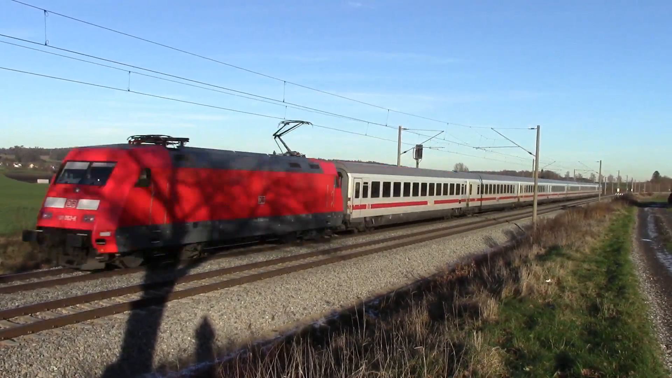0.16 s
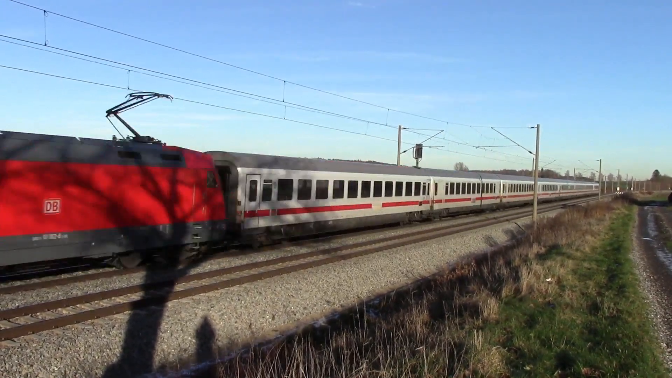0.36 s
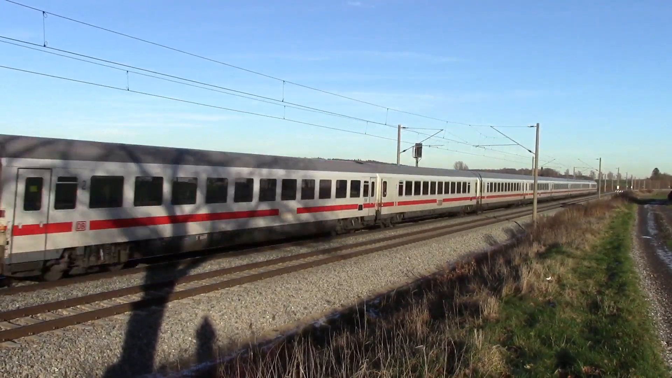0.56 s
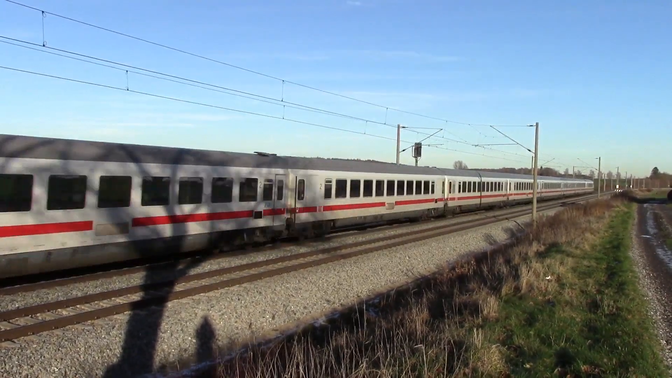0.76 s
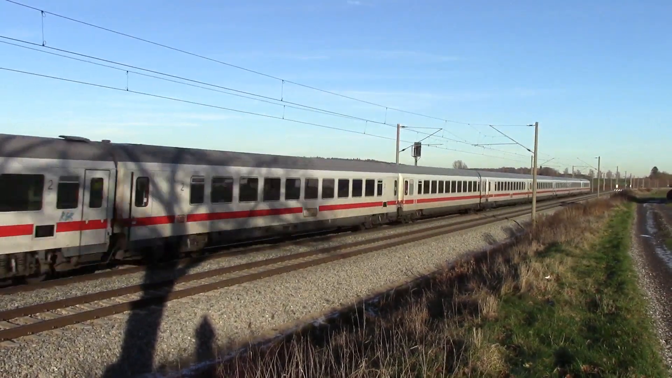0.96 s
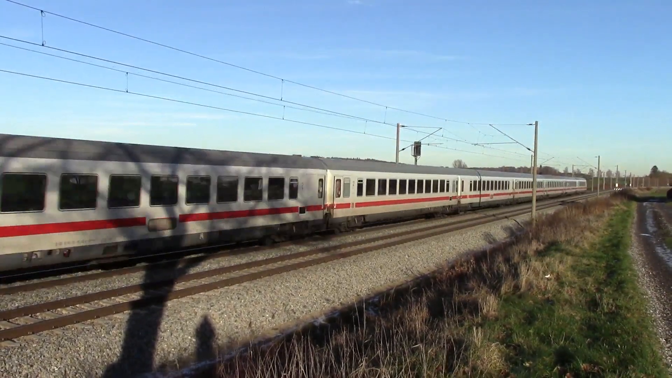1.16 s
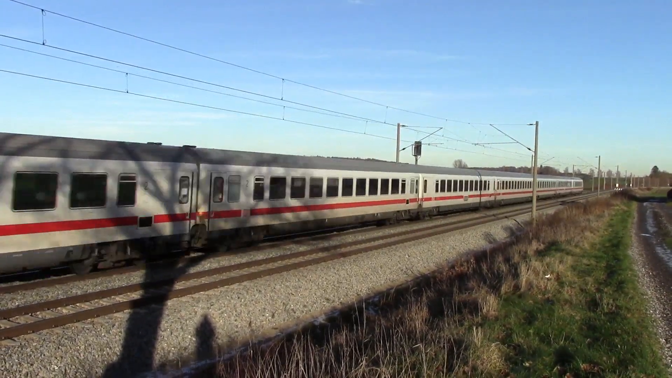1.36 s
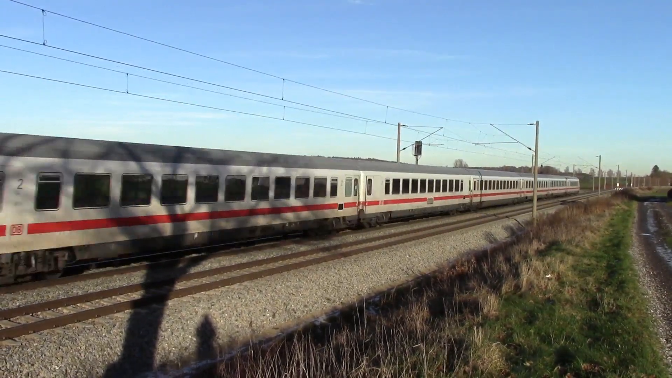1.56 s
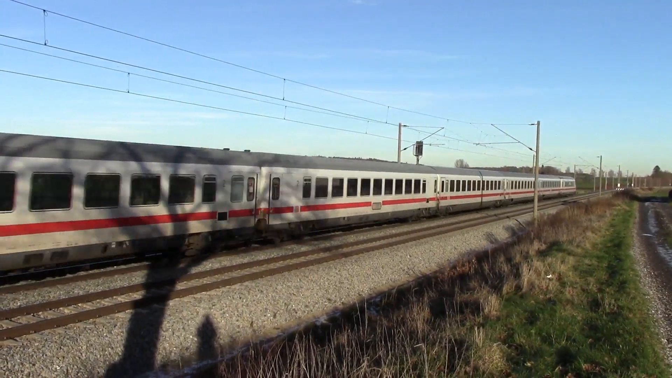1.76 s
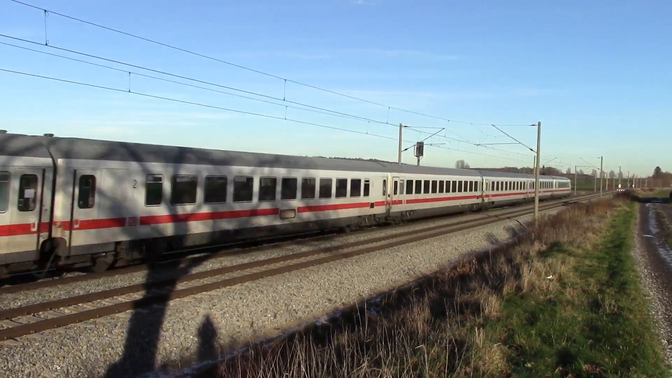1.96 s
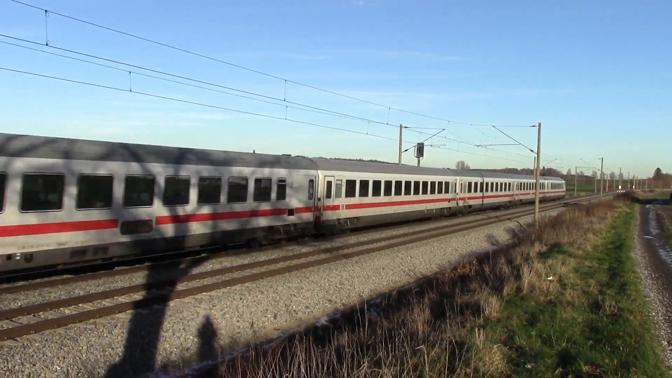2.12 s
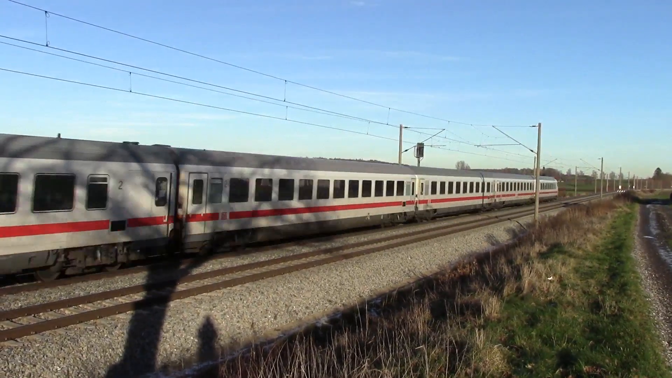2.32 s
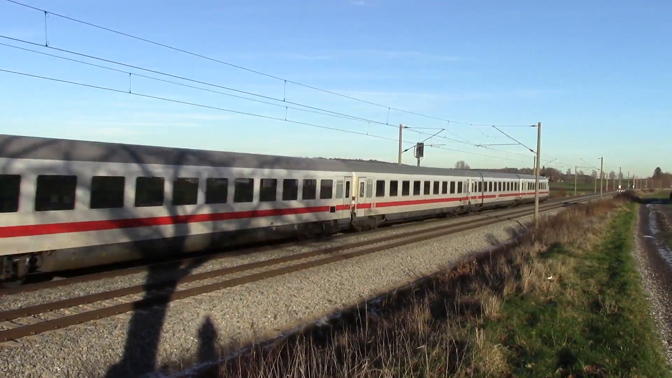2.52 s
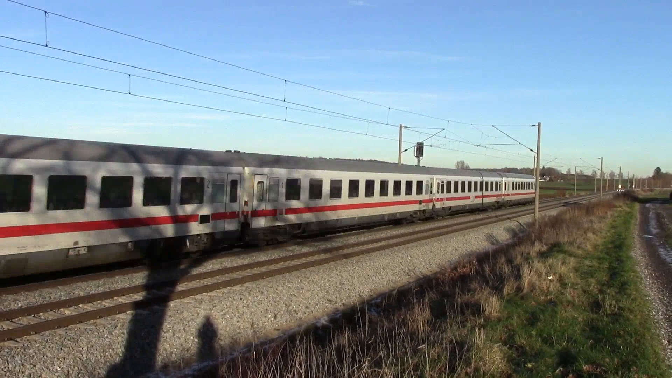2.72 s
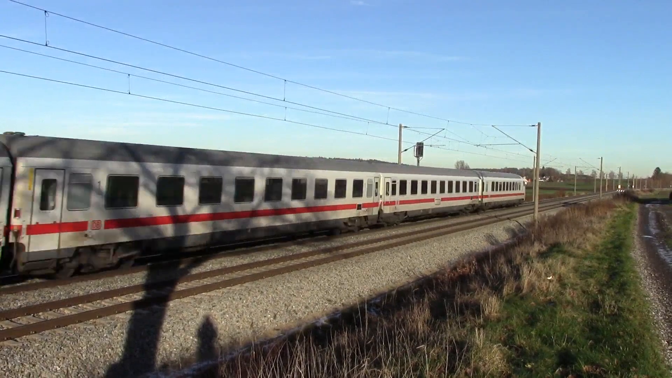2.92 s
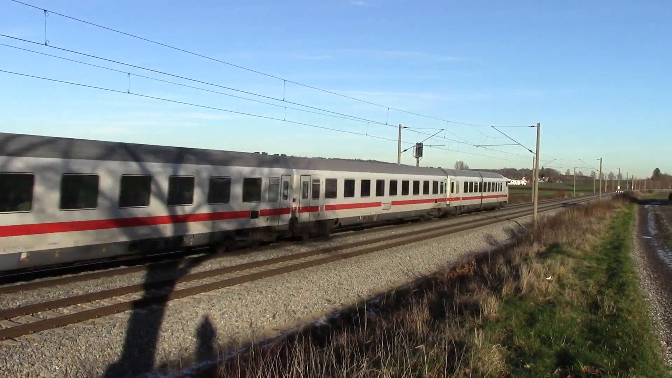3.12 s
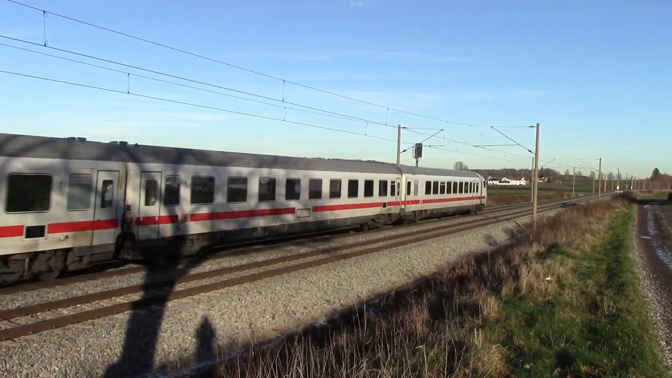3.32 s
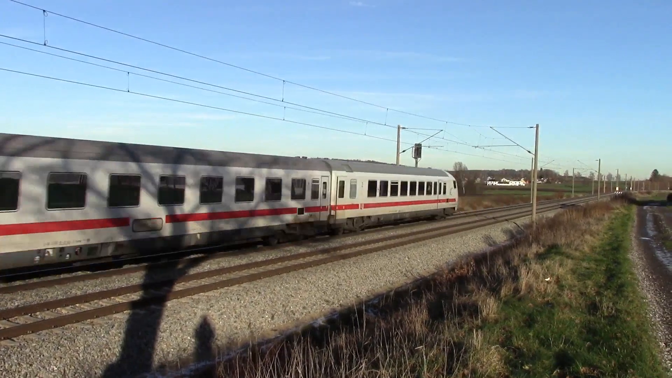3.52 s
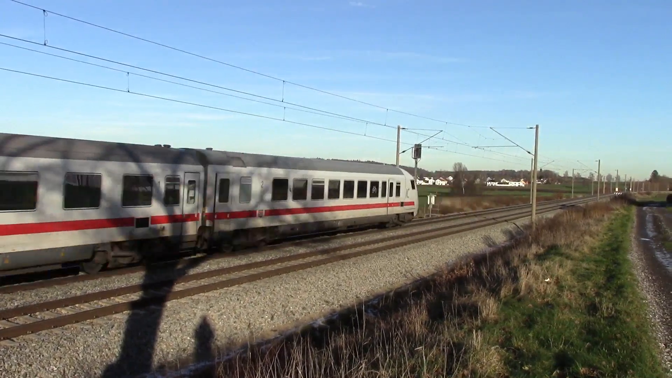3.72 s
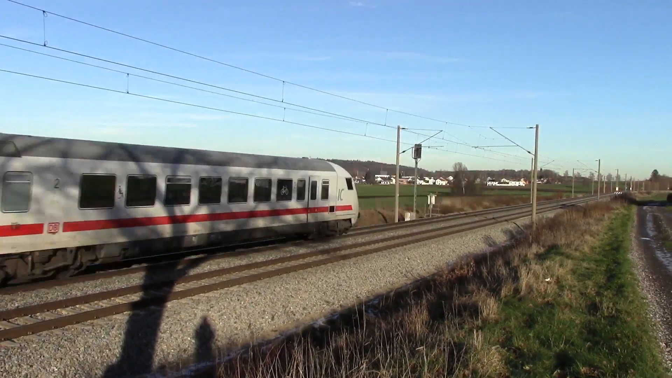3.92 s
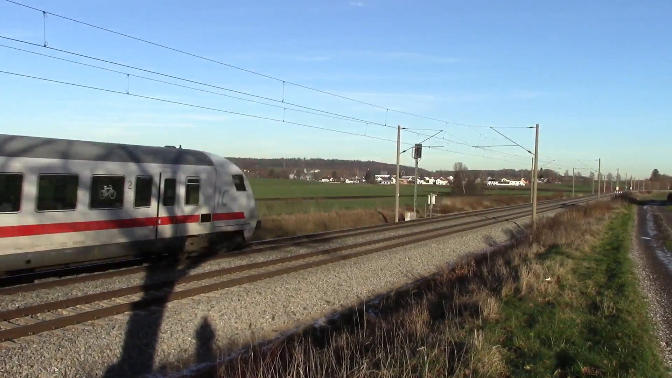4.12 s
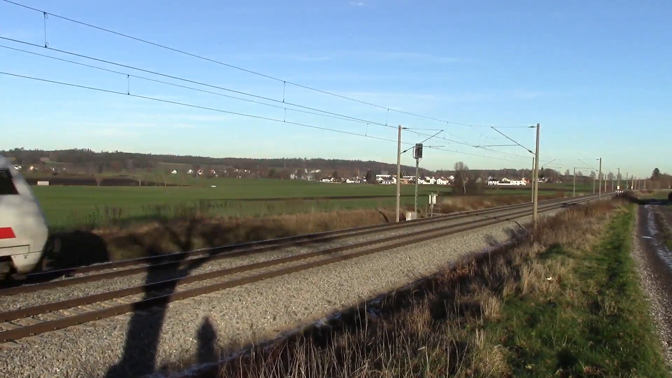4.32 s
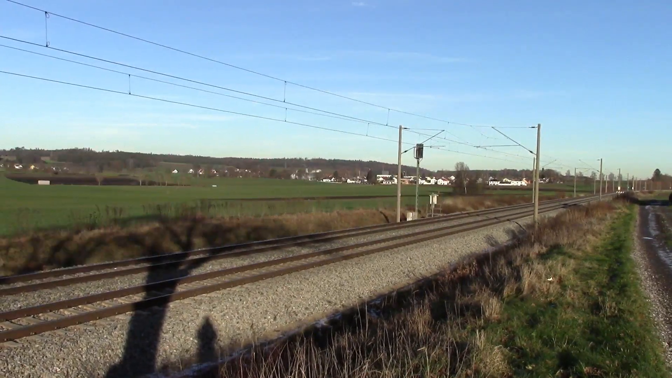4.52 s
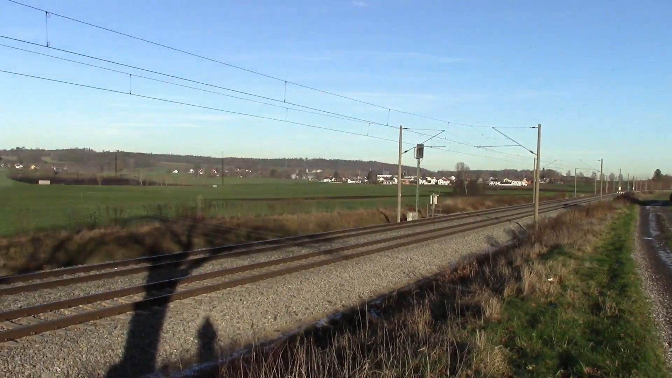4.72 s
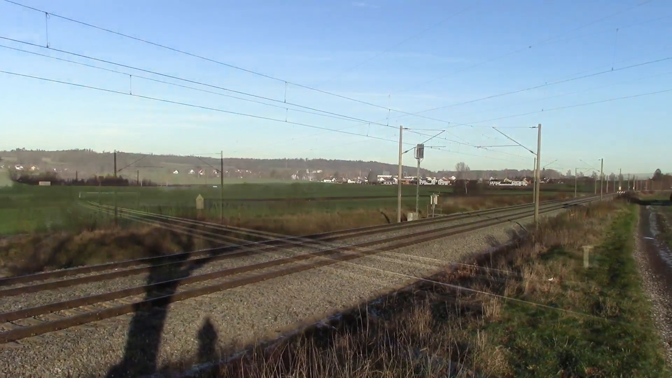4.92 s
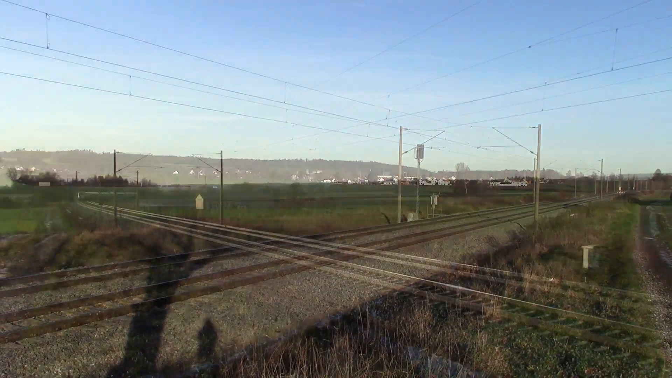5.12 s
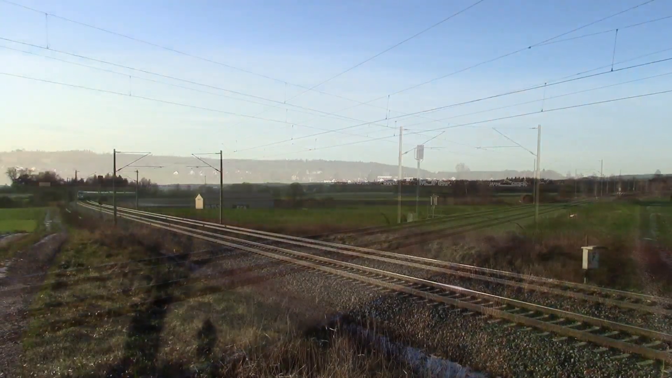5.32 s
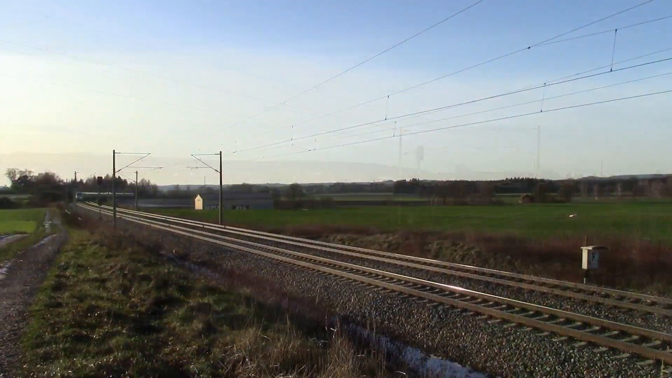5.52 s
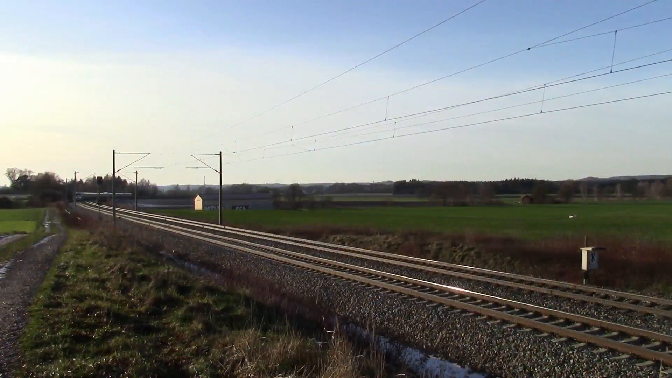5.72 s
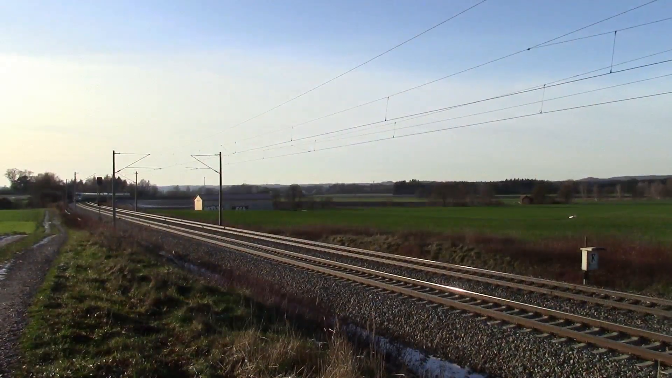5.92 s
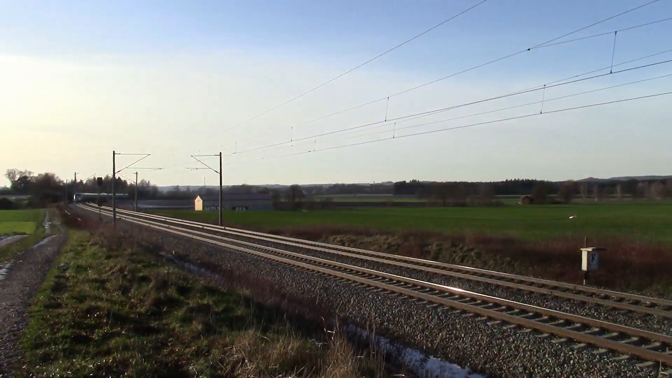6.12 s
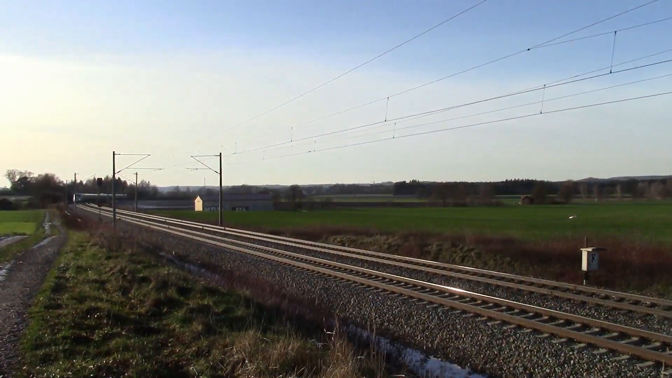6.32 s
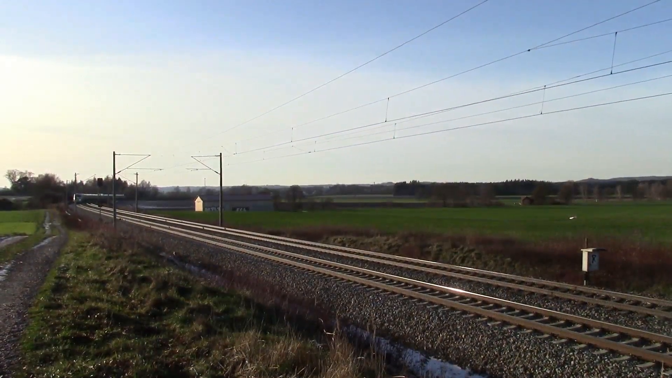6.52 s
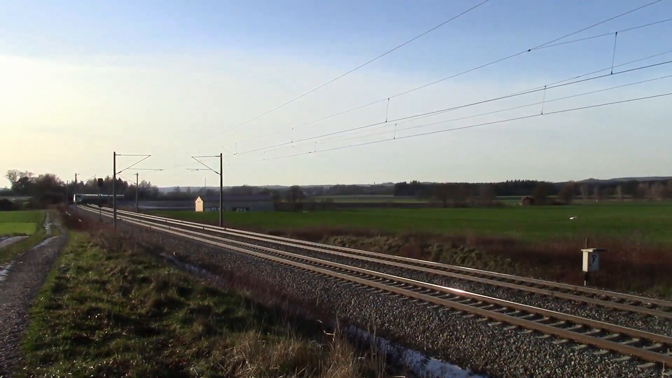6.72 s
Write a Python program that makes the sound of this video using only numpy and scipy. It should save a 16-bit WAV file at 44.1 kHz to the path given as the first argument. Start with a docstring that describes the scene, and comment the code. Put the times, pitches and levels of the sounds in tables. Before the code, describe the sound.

Open fields, close stereo microphone a few metres from the track. From 0 s the sound is already loud: an electric locomotive roars past, abreast at about 0.6 s, its unsteady gear, motor and fan tones sliding down in pitch beneath an airy high hiss. By 1 s it gives way to coaches: a dense, broad steel-on-steel rush with low body rumble swelling as each passes, duller at first and gradually brighter. From about 1.7 to 4.5 s bogies surge by roughly every half second, with short wavering metallic squeals and chirps around 2 kHz, strongest from 2.5 s. After 4.5 s the last wheels pass and the roar falls quickly; thin rail ringing trails around 5 s. Between 5 and 5.6 s it dissolves into very quiet, dull country air. From about 5.7 s a faint low engine hum near 90 Hz wavers and slowly grows to the end, with soft breeze puffs.

```python
"""Electric train racing past in open fields

An electric locomotive and its coaches race past a few metres from the microphone.
Gear, motor and fan tones with Doppler fall, and coloured noise for the pantograph's hiss, make the locomotive.
Filtered noise makes rail roar, air and bogie surges; short gliding sines are gear strands,
then singing wheels, last the ringing rails.
The rush dissolves into quiet country air, then the low harmonics of a distant engine emerge.
"""
import sys
import numpy as np
from scipy import signal
from scipy.fft import rfft, irfft
from scipy.io import wavfile
from scipy.ndimage import uniform_filter1d, minimum_filter1d, map_coordinates

SR = 44100
rng = np.random.default_rng(int(sys.argv[2]) if len(sys.argv) > 2 else 0)


def output_pcm(signal):
    """Save a mono or channel-first signal as 16-bit PCM at the path in sys.argv[1].

    Samples are clipped to [-1, 1] before scaling.
    """
    pcm = np.clip(np.atleast_2d(signal).T, -1, 1) * 32767
    wavfile.write(sys.argv[1], SR, np.round(pcm).astype(np.int16))


N = 298248
TIME = np.arange(N) / SR
BINS_HZ = np.arange(N // 2 + 1) * SR / N


def undb(db):
    """Decibels to gain."""
    return 10 ** (np.asarray(db) / 20)


def unit(x):
    """Scale to rms 1."""
    return x / np.sqrt(np.mean(np.abs(x) ** 2))


def across(points, hz):
    """Read (Hz, value) points on a log-frequency axis."""
    f, value = np.transpose(points)
    return np.interp(np.log(hz + 1), np.log(f), value)


def envelope(db, until_s, fall_db_per_s, from_s=0, rise_db_per_s=0):
    """Gain that rises, holds and falls away, straight in dB."""
    before = np.maximum(from_s - TIME, 0)
    after = np.maximum(TIME - until_s, 0)
    return undb(db - rise_db_per_s * before - fall_db_per_s * after)


def bump(middle_s, spread_s):
    """Gaussian bump of height 1 with the given standard deviation."""
    return np.exp(-((TIME - middle_s) / spread_s) ** 2 / 2)


def tone(hz):
    """Sine following an instantaneous frequency, peak 1."""
    return np.sin(2 * np.pi * np.cumsum(hz) / SR)


def walk(rate_hz):
    """Smooth chance with spread 1, changing about rate_hz times a second."""
    steps = TIME[::16]
    chance = rng.standard_normal(4096)
    smooth = map_coordinates(chance, [steps * rate_hz], order=3, mode="wrap")
    return unit(np.interp(TIME, steps, smooth))


def turbulence(colour, patchy_db, rate_hz, streak_db=0, tilt_db=0):
    """Coloured noise whose third-octave regions flare and sink; narrow streaks slide down in pitch."""
    hz, s, cells = signal.stft(rng.standard_normal(N), SR, nperseg=2048)
    octave, when = np.meshgrid(np.log2(1 + hz / 100), s, indexing="ij")
    chance = rng.standard_normal((512, 512))
    patches = map_coordinates(chance, [3 * octave, when * rate_hz], order=1, mode="wrap")
    sliding = 36 * (octave + .3 * when)
    streaks = map_coordinates(chance.T, [sliding, 11 * when], order=1, mode="wrap")
    # beyond its end points the colour falls 12 dB an octave
    beyond = np.abs(np.log2((hz + 1) / np.clip(hz + 1, colour[0][0], colour[-1][0])))
    db = (across(colour, hz) - 12 * beyond)[:, None]
    # the spectrum tilts about its own centre
    centre = np.average(octave[:, 0], weights=undb(2 * db[:, 0]))
    tilt = np.interp(s, TIME, tilt_db * np.ones(N)) * np.clip(octave - centre, -2, 2)
    cells = cells * undb(db + tilt + patchy_db * patches + streak_db * streaks)
    return unit(signal.istft(cells, SR)[1][:N])


def ring(hz, width_hz):
    """A resonance shaken by noise; its centre may glide."""
    shake = walk(width_hz) + 1j * walk(width_hz)
    carrier = np.exp(2j * np.pi * np.cumsum(hz * np.ones(N)) / SR)
    return unit(np.real(shake * carrier))


SPEED_M_S, SOUND_M_S, TRACK_M = 55, 343, 8.5
ABREAST_S = 0.63  # the locomotive is closest


def bearing(abreast_s=ABREAST_S):
    """Where a part of the locomotive is: -1 far ahead, 0 abreast, 1 far gone."""
    along_m = SPEED_M_S * (TIME - abreast_s)
    return along_m / np.hypot(along_m, TRACK_M)


def doppler(abreast_s):
    """Pitch ratio of a source passing at train speed."""
    return 1 / (1 + SPEED_M_S / SOUND_M_S * bearing(abreast_s))


# gear, motor and fan tones: pitch_on_board_hz, abreast_s, level_db, full_from_s, held_until_s
DRIVE_TONES = [(1212, .62, -27, .25, 0.61), (1155, .76, -29, 0.26, .44), (1240, .7, -27.5, 0.33, .44),
               (947, .64, -31, .5, 0.75), (571, 0.67, -32, .098, 0.27), (1522, 0.83, -32, 0.35, 0.46),
               (1790, .68, -37, .05, .16), (1220, .62, -25, 0.71, 0.775), (629, .66, -32.5, .039, .4)]
TONE_RISE_DB_PER_S, TONE_FALL_DB_PER_S = 35, 130
TONE_WAVER_SHARE, TONE_THROB_DB = 0.02, 3.2  # spread


def drive_tones():
    """Gear, motor and fan tones of many pitches, each unsteady and throbbing, fall as the locomotive passes."""
    out = 0
    for pitch_hz, abreast_s, level_db, from_s, until_s in DRIVE_TONES:
        hz = pitch_hz * doppler(abreast_s) * (1 + TONE_WAVER_SHARE * walk(85))
        throb = undb(TONE_THROB_DB * walk(37.9).clip(-1.5, 1.5))
        gain = throb * envelope(level_db, until_s, TONE_FALL_DB_PER_S, from_s, TONE_RISE_DB_PER_S)
        out = out + gain * np.sqrt(2) * tone(hz)
    return out


# locomotive's running roar, spectrum: freq_hz, density_db_per_hz (relative)
ROAR_COLOUR = [(120, -51), (200, -9.5), (270, 0.5), (350, -3), (480, 0.5), (750, -2.5), (1000, -0.5),
               (1300, 0), (1600, -2), (2400, -52), (4000, -38)]
# pantograph's hiss, spectrum: freq_hz, density_db_per_hz (relative)
PANTOGRAPH_COLOUR = [(3000, -12), (4500, -6), (6500, -16), (8000, 3), (9500, 4), (10400, 1), (11500, -10),
                     (13000, -24), (15500, -30)]
FAN_HZ = 592  # cooling fan, as heard on board


def locomotive():
    """Drive tones and fan roar drop in pitch; heavy wheels roar, the pantograph hisses on the wire."""
    fan = ring(FAN_HZ * doppler(ABREAST_S), width_hz=220)
    fan = fan * envelope(-20, until_s=-0.21, fall_db_per_s=33)
    roar = turbulence(ROAR_COLOUR, patchy_db=2.0, rate_hz=20.8, streak_db=3.5)
    roar = roar * envelope(-22.5, until_s=0.69, fall_db_per_s=21)
    hiss = turbulence(PANTOGRAPH_COLOUR, patchy_db=3.5, rate_hz=19.2, streak_db=-4.0)
    hiss = hiss * envelope(-35.5, until_s=0.57, fall_db_per_s=51)
    return drive_tones() + fan + roar + hiss


# spectra of body rumble, rail roar, wheel noise, air hiss: freq_hz, density_db_per_hz (relative)
BODY_COLOUR = [(25, -27), (55, -38), (85, -12.5), (125, -14.5), (170, -8.5), (245, 0.5), (310, -0.5),
               (430, -3), (800, -19.5)]
RAIL_COLOUR = [(200, -22), (330, -18.5), (460, -5.5), (660, -4.5), (820, -1), (960, 0.5), (1060, -1),
               (1200, -5.5), (1500, -24), (2500, -61)]
WHEEL_COLOUR = [(800, -68), (1200, -5), (1450, 1), (1760, 1.5), (2100, 0), (2400, -1), (2750, -3),
                (3400, -7), (4000, -12), (4600, -25), (6500, -49)]
AIR_COLOUR = [(2000, -10), (3500, 6.5), (4700, 1.5), (6000, 0), (7200, -1.5), (8500, -7.5), (10200, -11),
              (12500, -20), (16000, -31)]
# air hiss over time: time_s, level_db (before a 3.5 dB lift)
HISS = [(0.04, -30), (0.56, -30.5), (1.21, -37.5), (1.96, -36), (3.03, -40.5), (3.08, -38.5), (4.27, -32.5),
        (4.39, -31.5), (4.65, -36), (4.78, -35), (4.98, -46), (5.32, -49), (5.5, -57)]
# rumble swells as car bodies go by: middle_s, level_db
RUMBLES = [(.23, -33.5), (.62, -34), (1.02, -33.5), (1.45, -33.5), (1.88, -37), (2.86, -39), (3.21, -35),
           (3.52, -36.5), (3.82, -37), (4.66, -40), (4.84, -36.5), (5.23, -40.5)]
RUMBLE_SPREAD_S = 0.13 / np.sqrt(2)
# wheel noise sinks behind the locomotive, between bogies and behind the last coach:
# middle_s, half_length_s (to 1/e of the depth), depth_db
LULLS = [(0.953, 0.47, -1), (1.984, 0.041, -1.5), (2.37, 0.16, -0.6), (3.45, .04, -2), (4.66, 0.089, -1.5)]
BODY_EASE_DB_PER_S, RAIL_EASE_DB_PER_S = 1.32, 0.5  # as the heavy locomotive draws away
# wheels and air: bright head-on, dull just behind the locomotive, brighter to the tail
HEAD_ON_TILT_DB_PER_OCT, TILT_RISE_DB_PER_OCT_PER_S, NEUTRAL_S, TAIL_S = 4, 0.86, 2.16, 4.5


def rolling():
    """Rough steel on steel shakes bodies, rails and wheels; air tears along the train."""
    tilt_db = TILT_RISE_DB_PER_OCT_PER_S * (np.minimum(TIME, TAIL_S) - NEUTRAL_S)
    tilt_db = tilt_db + HEAD_ON_TILT_DB_PER_OCT * np.maximum(-bearing(), 0)

    steady = envelope(-36.5, until_s=5.8, fall_db_per_s=6.4) * undb(-BODY_EASE_DB_PER_S * TIME)
    swell_power = sum(undb(level_db) ** 2 * bump(s, RUMBLE_SPREAD_S) for s, level_db in RUMBLES)
    body_gain = np.sqrt(steady ** 2 + swell_power)
    body = body_gain * turbulence(BODY_COLOUR, patchy_db=1.0, rate_hz=12)

    rail_gain = envelope(-26.5, until_s=4.42, fall_db_per_s=12.7) * undb(-RAIL_EASE_DB_PER_S * TIME)
    rail = rail_gain * turbulence(RAIL_COLOUR, patchy_db=1.76, rate_hz=14, streak_db=-0.5)

    lull_db = sum(depth_db * bump(s, half_s / np.sqrt(2)) for s, half_s, depth_db in LULLS)
    wheel_gain = undb(lull_db) * envelope(-21, until_s=4.72, fall_db_per_s=27)
    wheels = wheel_gain * turbulence(WHEEL_COLOUR, patchy_db=0.8, rate_hz=16, streak_db=1.1, tilt_db=tilt_db)

    hiss_s, hiss_db = np.transpose(HISS)
    air_gain = undb(np.interp(TIME, hiss_s, hiss_db) + 3.5)
    air = air_gain * turbulence(AIR_COLOUR, patchy_db=1.5, rate_hz=14, tilt_db=tilt_db)

    # changing load on the contact patches makes the bright sound flutter as one
    flutter = undb(0.53 * walk(30) + 0.45 * walk(110))
    return body + rail + (wheels + air) * flutter


# hollow surges in the roar: middle_s, spread_s, pitch_hz, width_hz, level_db
BOOMS = [(0.026, 0.036, 760, 168, -26), (0.122, 0.043, 665, 141.4, -23.5), (1.074, .055, 1330, 331, -27),
         (.394, 0.026, 755, 234, -24), (0.957, .025, 1000, 250, -25), (3.054, 0.047, 685, 209.6, -35),
         (3.218, 0.039, 680, 210.4, -34), (4.753, 0.083, 3520, 501, -31), (4.9, 0.027, 640, 199, -34),
         (4.973, 0.015, 619, 188.6, -32.5), (4.962, .025, 950, 299, -34.5), (5.087, 0.022, 2000, 350, -36),
         (5.227, .042, 310, 99.8, -41)]


def booms():
    """Short hollow surges, noise-shaken resonances, stand out of the roar."""
    out = 0
    for middle_s, spread_s, pitch_hz, width_hz, level_db in BOOMS:
        out = out + undb(level_db) * bump(middle_s, spread_s) * ring(pitch_hz, width_hz)
    return out


SQUEALS_PER_S, SQUEAL_MIN_DB, SQUEAL_MEAN_S, SQUEAL_MEAN_SLIDE_OCT_PER_S = 17, -30, .075, .3
SQUEAL_LOW_HZ, SQUEAL_HIGH_HZ = 1503, 2250
COACHES_FROM_S, COACHES_UNTIL_S = 2.2, 4.5


def faint_squeals():
    """Rows like those of GLIDING_TONES, drawn by chance for the many quieter wheels of the coaches."""
    span_s = COACHES_UNTIL_S - COACHES_FROM_S
    rows = []
    for when, long, pitch, loud, slide in rng.random((200, 5))[:int(SQUEALS_PER_S * span_s)]:
        middle_s = COACHES_FROM_S + when * span_s
        length_s = SQUEAL_MEAN_S * (.5 + long)
        pitch_hz = SQUEAL_LOW_HZ * (SQUEAL_HIGH_HZ / SQUEAL_LOW_HZ) ** pitch
        level_db = SQUEAL_MIN_DB + 2 * loud
        rows.append((middle_s, length_s, pitch_hz, level_db, 2 * SQUEAL_MEAN_SLIDE_OCT_PER_S * slide))
    return rows


# short gliding tones: locomotive gear strands first, then singing wheels, last the ringing rails:
# middle_s, length_s, pitch_hz, level_db (peak), fall_oct_per_s
GLIDING_TONES = [(.628, .05, 978, -21, 0), (.655, .09, 1520, -21, -0.5), (.85, 0.07, 830, -26.5, 2.5),
                 (.88, 0.11, 1935, -31, 1), (.895, 0.065, 1300, -27, 2.8), (.975, .05, 2260, -29, -1.5),
                 (1.08, .12, 2770, -29.5, -0.5), (1.08, .07, 1222, -25, 1.5), (1.2, .1, 2040, -28, -1.5),
                 (1.265, .22, 2570, -28.5, .5), (1.35, 0.14, 1930, -27, 0.5), (1.38, .13, 2210, -29, 0.2),
                 (1.45, 0.25, 2780, -29, .5), (1.53, 0.13, 2210, -30.5, -1), (1.69, .28, 2560, -27.5, 1),
                 (1.69, 0.075, 1734, -22, 0.7), (1.722, 0.11, 1945, -24.5, -.5),
                 (2.08, 0.14, 2150, -28.5, .3), (2.14, .05, 1990, -20, 0), (2.265, 0.074, 1995, -25, -.4),
                 (2.43, 0.066, 1765, -25, 0), (2.51, .05, 3440, -24, 1.2), (2.595, .08, 3220, -28, 1),
                 (2.61, 0.085, 2024, -29, 2), (2.635, 0.053, 2420, -21, 2), (2.73, .07, 1680, -22, 0.5),
                 (2.76, .11, 1935, -21, 0.8), (2.845, 0.053, 2690, -24.5, -2.5),
                 (2.887, 0.065, 2735, -22.5, -0.2), (2.88, .13, 2180, -25, 1),
                 (2.93, 0.14, 1753, -22.5, 0.6), (3.0, .09, 1510, -28, -0.5), (3.05, 0.098, 2145, -26, 1),
                 (3.127, .048, 1710, -20, .3), (3.14, .06, 1995, -24, 0), (3.395, 0.057, 1744, -22, 0),
                 (3.565, .12, 1790, -21.5, 0.2), (3.98, 0.072, 1560, -23, 2.5), (4.035, .04, 1535, -28, -2),
                 (4.07, 0.063, 1790, -22, 0), (4.17, 0.037, 2600, -18, 3), (4.19, 0.071, 2125, -25, 0),
                 (4.21, .052, 2205, -21, 1.5), (4.225, .06, 2750, -24, 1.5),
                 (4.525, .083, 2040, -22.5, -0.5), (4.73, .05, 2085, -27, -1), (5.2, .2, 1890, -43, 0.5),
                 (5.45, .24, 1830, -47, -1)]


def gliding_tones(waver_hz=15, rough_db=3.0):
    """Gear strands, then wheels, last the rails sing out as short wavering sines; most slide down in pitch."""
    out = np.zeros(N)
    waver = waver_hz * walk(70)
    flutter = undb(rough_db * walk(45).clip(-1.5, 1.5))
    for middle_s, length_s, pitch_hz, level_db, fall_oct_per_s in GLIDING_TONES + faint_squeals():
        span = np.flatnonzero(np.abs(TIME - middle_s) < length_s / 2)
        own = (span + rng.integers(N)) % N  # every tone wavers in its own way
        since_s = TIME[span] - middle_s
        hz = pitch_hz * 2 ** (-fall_oct_per_s * since_s) + waver[own]
        swell = np.sqrt(np.cos(np.pi * since_s / length_s))
        out[span] += undb(level_db) * swell * flutter[own] * tone(hz)
    return out


# bogies going by: middle_s, level_db, half_length_s, rush_db (air relative to wheels)
BOGIES = [(1.36, -34, 0.042, -21), (1.695, -26.5, 0.033, -9), (2.145, -24, .022, -10),
          (2.631, -19.5, 0.038, -22), (3.118, -21, 0.027, -20), (3.58, -28, 0.045, -18),
          (3.756, -23, 0.0233, -23), (4.208, -28, .04, -13), (4.527, -25, 0.037, -10),
          (4.929, -34, .04, -20)]
# wheel modes: freq_hz, width_hz, level_db (relative)
WHEEL_MODES = [(1746, 190, 2), (1982, 160, 6), (2186, 300, 2), (2830, 380, 0), (3300, 400, 0)]


def bogies(doppler_share=0.0363):
    """Each bogie surges by with its wheels ringing, sharp on the way in and flat on the way out."""
    wheel = unit(sum(undb(level_db) * ring(hz, width_hz) for hz, width_hz, level_db in WHEEL_MODES))
    rush = turbulence(AIR_COLOUR, patchy_db=1.5, rate_hz=12)
    out = np.zeros(N)
    for middle_s, level_db, half_s, rush_db in BOGIES:
        near = np.abs(TIME - middle_s) < 4 * half_s
        distance = np.hypot(1, (TIME[near] - middle_s) / half_s)  # 1 at the closest
        emitted = (TIME[near] - doppler_share * half_s * distance) * SR
        gain = undb(level_db) * np.exp((1 - distance ** 2) / 2)
        ringing = map_coordinates(wheel, [emitted], order=3)
        out[near] += gain * (ringing + undb(rush_db) * rush[near])
    return out


# rail modes: freq_hz, width_hz, level_db (relative)
RAIL_MODES = [(1915, 22, -2.5), (2000, 54, -3), (3060, 150, -5), (3440, 120, -5)]


def rail_ring():
    """The rails ring on behind the train as narrow noise-shaken modes."""
    modes = sum(undb(level_db) * ring(hz, width_hz) for hz, width_hz, level_db in RAIL_MODES)
    return modes * envelope(-38, until_s=5, fall_db_per_s=32, from_s=5, rise_db_per_s=21)


WHINE_DRIFT_DB = 1  # spread


def whine(hz, waver_hz):
    """A thin tone of unsteady pitch that drifts in and out on the air."""
    drift = undb(WHINE_DRIFT_DB * walk(5).clip(-2, 1))
    return drift * np.sqrt(2) * tone(hz + waver_hz * walk(3 * waver_hz))


# open country, spectrum: freq_hz, density_db_per_hz (relative)
COUNTRY_COLOUR = [(30, -42), (60, -1), (120, -4.5), (200, 2.5), (330, -2.5), (700, 0.5), (1250, -4.5),
                  (1500, -9.5), (2000, -12.5), (3000, -21.5), (4800, -30), (10000, -36.5), (15500, -35)]
# faint whines: pitch_hz, waver_hz, level_db
WHINES = [(1333, 7, -60), (1340, 7, -60.5), (7140, 55, -78), (7220, 75, -80), (9560, 20, -82)]
# breeze nudging the microphone: middle_s, spread_s, level_db
PUFFS = [(5.755, .025, -47), (5.835, .02, -44), (6.58, .02, -45)]
PUFF_HZ, PUFF_WIDTH_HZ = 116, 80


def country():
    """A dull far-off rush over the fields, with a few thin whines and soft puffs of breeze."""
    air = undb(-45.5) * turbulence(COUNTRY_COLOUR, patchy_db=1.0, rate_hz=9.6)
    puff_gain = sum(undb(level_db) * bump(s, spread_s) for s, spread_s, level_db in PUFFS)
    puffs = puff_gain * ring(PUFF_HZ, PUFF_WIDTH_HZ)
    whines = sum(undb(level_db) * whine(hz, waver_hz) for hz, waver_hz, level_db in WHINES)
    return air + puffs + whines


# distant engine's harmonics of the firing rate: multiple, level_db (relative)
ENGINE_ORDERS = [(1, -1), (2, -12.5), (3, -23), (6, -20), (9, -25)]
ENGINE_EMERGES_S, ENGINE_RISE_DB_PER_S = 5.72, 29
# once emerged: firing rate and level, and their climb as it nears
ENGINE_FIRING_HZ, ENGINE_CLIMB_HZ_PER_S = 90.2, 0.8
ENGINE_DB, ENGINE_GROWTH_DB_PER_S = -49, 4.5


def engine():
    """A far engine emerges and draws slowly nearer: only low harmonics carry, wavering in the air."""
    since_s = TIME - ENGINE_EMERGES_S
    hz = ENGINE_FIRING_HZ + ENGINE_CLIMB_HZ_PER_S * since_s
    phase = 2 * np.pi * np.cumsum(hz * (1 + 0.00255 * walk(9))) / SR
    hum = 0
    for multiple, level_db in ENGINE_ORDERS:
        waver_db = 1.3 * multiple * walk(4.9).clip(-1, 1)
        hum = hum + undb(level_db + waver_db) * np.sin(round(multiple) * phase)
    slope_db_per_s = np.where(since_s < 0, ENGINE_RISE_DB_PER_S, ENGINE_GROWTH_DB_PER_S)
    return undb(ENGINE_DB + since_s * slope_db_per_s) * unit(hum)


def scattered(x):
    """The same spectrum from moment to moment with unrelated phases, as thrown back by the ballast."""
    cells = signal.stft(x, SR, nperseg=512)[2]
    turned = cells * np.exp(2j * np.pi * rng.random(cells.shape))
    return np.sqrt(2) * signal.istft(turned, SR)[1][:N]


# scattered train sound in the side signal: freq_hz, level_db
SCATTER = [(200, -62), (700, -50), (1000, -69), (1400, -24.5), (2000, -18), (3000, -14), (5000, -5.5),
           (8000, -7), (12500, 0), (15000, -7)]
# train's level difference: freq_hz, left_minus_right_db
LEAN = [(900, 0), (1500, -2.1), (2400, -1), (4000, -0.5), (5500, 4), (8100, 4), (10500, 7.5), (14000, 0.5)]
# train's phase difference: freq_hz, left_lead_rad
LEAD = [(1000, 0), (1800, 0.1), (2700, 0.44), (4000, 0.14), (5200, 0.65), (10400, 0.17), (12000, 0.07)]
# fields sounding from all around, in the side signal: freq_hz, level_db
COUNTRY_SCATTER = [(60, -20), (300, -20), (800, -24), (1400, -19), (4400, -11), (15000, -7)]
# the image narrows once per coach, as its bogies come in front
COACH_S, NARROW_S, WIDTH_SWING_DB = .485, 2.67, 1.5


def microphones(near, far):
    """Two close ports: the bass is shared; near treble reaches the left first and is partly scattered."""
    lean = np.tanh(np.log(undb(across(LEAN, BINS_HZ))) / 2 + .5j * across(LEAD, BINS_HZ))
    near_scatter = rfft(scattered(near)) * undb(across(SCATTER, BINS_HZ))
    near_side = irfft(rfft(near) * lean + near_scatter, N)
    far_side = irfft(rfft(scattered(far)) * undb(across(COUNTRY_SCATTER, BINS_HZ)), N)
    swing = undb(-WIDTH_SWING_DB * np.cos(2 * np.pi * (TIME - NARROW_S) / COACH_S))
    # widens as the locomotive comes abreast, then slowly narrows from 2.5 s
    width = swing * envelope(-3, until_s=2.5, fall_db_per_s=2, from_s=0.64, rise_db_per_s=36)
    middle = near + far
    side = width * near_side + far_side
    return np.array([middle + side, middle - side])


DISSOLVE_S, DISSOLVE_HALF_S = 5.313, 0.29  # middle, half length


def scene():
    """The train gives way to the quiet of the fields at equal power; the engine hums in the centre."""
    train = locomotive() + rolling() + booms() + gliding_tones() + bogies() + rail_ring()
    share = np.clip((1 + (TIME - DISSOLVE_S) / DISSOLVE_HALF_S) / 2, 0, 1)
    return microphones(np.sqrt(1 - share) * train, np.sqrt(share) * country()) + engine()


LIMIT_DB, TOP_HZ = -5, 15500


def record(dry):
    """A quick limiter holds down the highest peaks, and the recorder cuts the top."""
    room = np.minimum(1, undb(LIMIT_DB) / (np.abs(dry).max(axis=0) + 1e-9))
    gain = uniform_filter1d(minimum_filter1d(room, size=129), size=129)
    lowpass = signal.ellip(10, .2, 80, TOP_HZ, fs=SR, output="sos")
    return signal.sosfilt(lowpass, dry * gain)


dry = scene()
out = record(dry)
output_pcm(out)
```